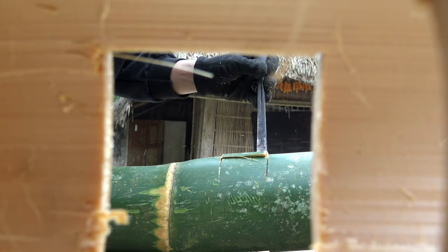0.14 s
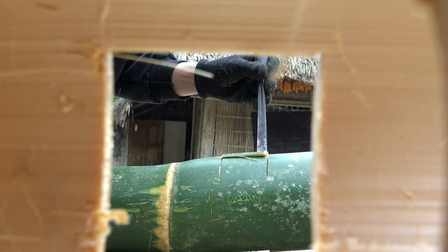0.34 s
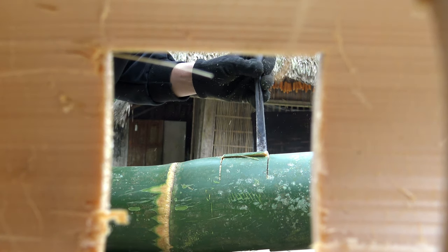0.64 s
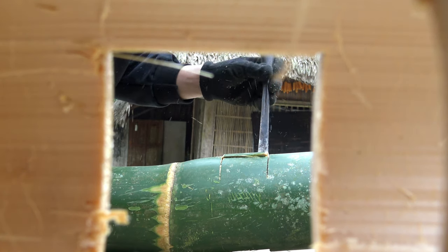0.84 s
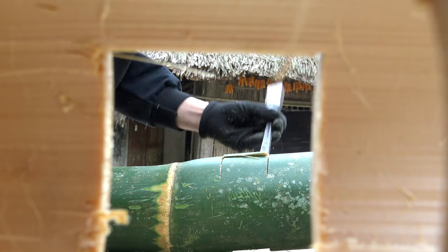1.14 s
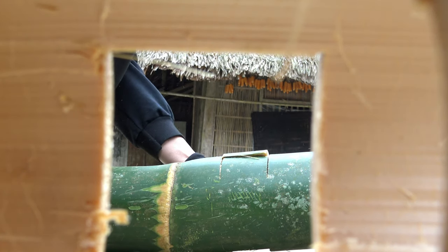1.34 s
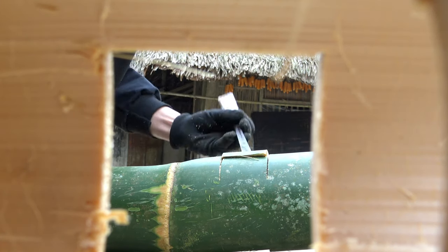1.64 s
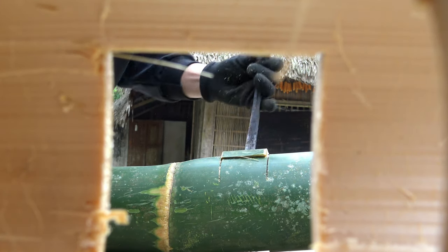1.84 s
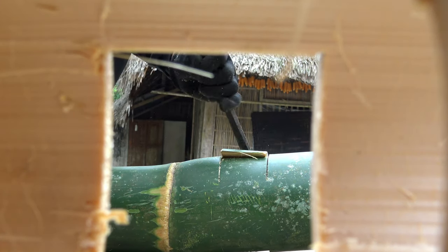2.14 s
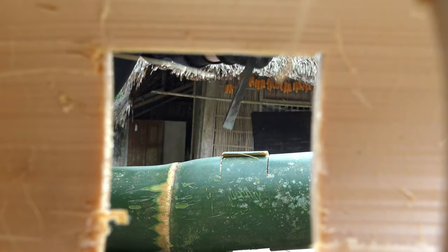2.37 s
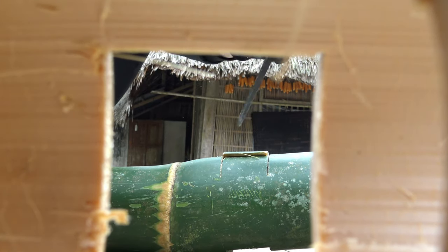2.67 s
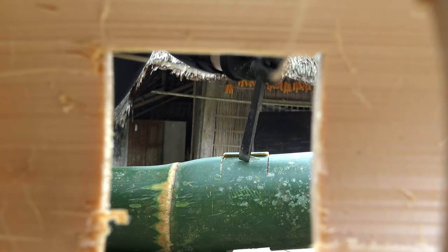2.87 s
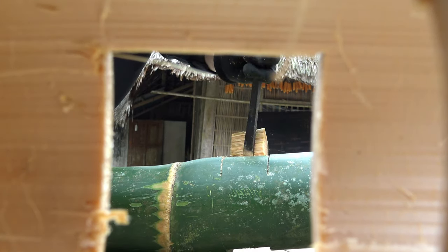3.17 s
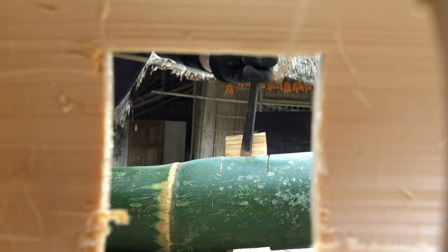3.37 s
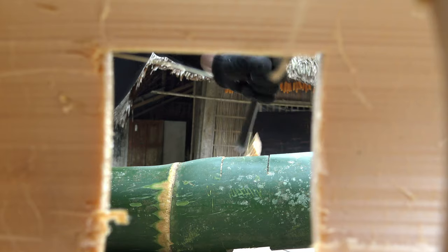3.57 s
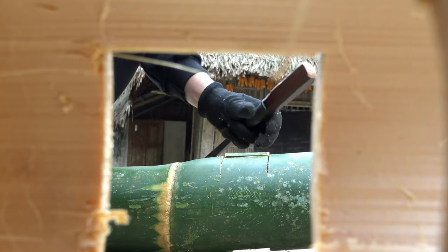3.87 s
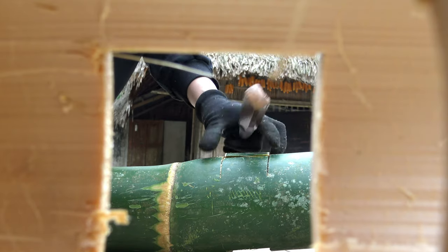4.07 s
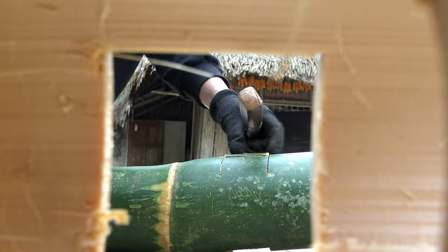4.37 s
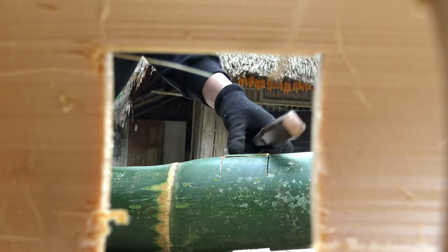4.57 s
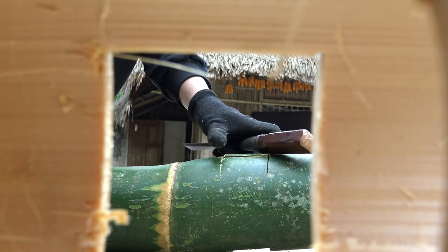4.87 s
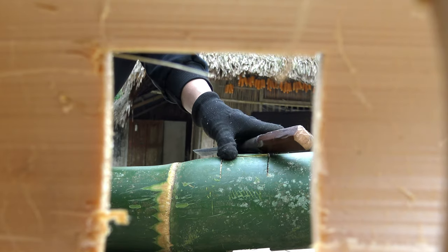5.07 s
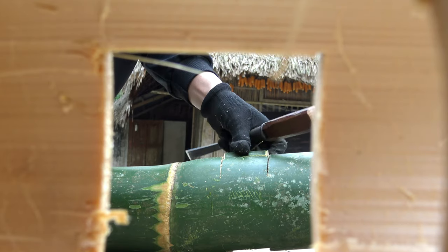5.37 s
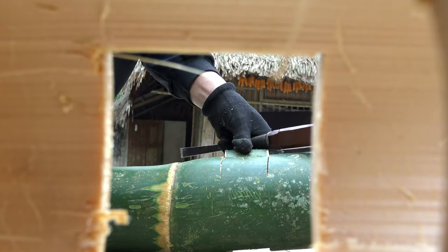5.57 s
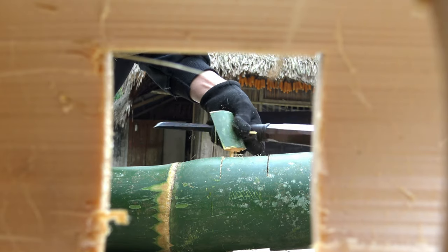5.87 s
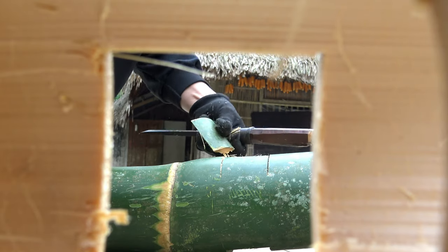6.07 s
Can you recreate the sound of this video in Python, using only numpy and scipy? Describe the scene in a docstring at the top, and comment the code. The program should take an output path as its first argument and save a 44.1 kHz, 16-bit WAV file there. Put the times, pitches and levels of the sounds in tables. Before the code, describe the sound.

Outdoors by a hut, with quiet air, a thin high insect hiss and a very faint bird, close to a thick bamboo tube. At about 0.1, 0.5 and 0.85 s three very loud blows drive a steel blade in: short hard ring, hollow boom, low thud, clipped by the microphone, with dying echoes from the yard. From 1.1 to 2.3 s the blade scrapes and levers in the cut, gritty and dry, with small woody knocks and a firmer one at 2.1. A short lull, then a dull knock at 2.9, a fast smooth slide at 3.05 ending in a knock at 3.2, more prying, a bright steel clink at 3.6 and a strong double knock near 3.74. Softer sparse taps and faint scraping run from 4.3 to 5.6. A loud woody crack at 5.74 frees the piece, followed by a light splintery clink at 5.9.

```python
"""Three hard blows drive a blade into a thick green bamboo tube: ringing steel modes, a boom from the tube, a thud.
The blade then scrapes and levers in the cut, as clumps of tiny slips that sound tube and steel.
Taps on modelled tube modes make the hollow knocks, until a piece of the wall snaps free.
A hut throws the blows back as dying noise; insects hiss as filtered noise and a small bird chirps far away.
The blows overload the close microphone, which clips and is then limited."""
import sys
import numpy as np
from scipy import signal
from scipy.fft import rfft, irfft, next_fast_len
from scipy.io import wavfile
from scipy.ndimage import uniform_filter1d

SR = 44100
rng = np.random.default_rng(int(sys.argv[2]) if len(sys.argv) > 2 else 0)


def dump_mix(stems):
    """Bounce the given channels to the path in sys.argv[1] as a 16-bit WAV at rate SR."""
    frames = np.atleast_2d(stems).T  # one column per channel
    limited = np.clip(frames, -1, 1)  # hard clip at full scale
    pcm = np.round(limited * 32767).astype(np.int16)
    wavfile.write(sys.argv[1], SR, pcm)


N = 273861  # length in samples

# Still air, relative spectrum: [f/Hz, density/dB per Hz]
AIR_SPECTRUM = [(20, -35.5), (45, -25), (100, -15.5), (170, -15.5), (300, -12.5), (600, -12), (1000, -16),
                (2200, -18.5), (3800, -18), (5500, -21), (6700, -32.5), (10000, -34.5), (15500, -33.5)]
# Steady band of insects, relative spectrum: [f/Hz, density/dB per Hz]
INSECT_SPECTRUM = [(3000, -41), (4200, -13), (4650, -4), (4950, -4.5), (5300, -8.5), (5900, -27),
                   (7200, -38.5), (7900, -17), (9000, -33.5)]
# Falling chirps of a far bird: [t/s, start f/Hz, level/dB]
BIRD_CHIRPS = [(2.965, 4400, -57), (4.57, 4450, -60), (5.03, 3810, -58.5), (5.941, 3960, -58),
               (6.084, 3500, -58)]
# Soft hollow hoots: [t/s, level/dB]
SOFT_HOOTS = [(2.54, -51.5), (4.08, -54.5), (4.545, -51.5), (5.03, -56)]
# Echo of the hut, relative colour: [f/Hz, level/dB]
ECHO_COLOUR = [(30, -44.5), (100, -20.5), (190, 1.5), (300, -7.5), (420, 1), (700, 2.5), (1100, -12.5),
               (2300, -11.5), (3200, -22), (4500, -27), (6000, -39), (9000, -45), (14000, -54.5)]
# Echo of the hut, decay: [f/Hz, t60/s]
ECHO_T60 = [(100, 0.48), (500, 0.35), (1500, 0.73), (4000, 0.98), (12000, 0.25)]

# Levering strokes in the cut; the more the edge bears, the more steel and fizz:
# [start t/s, end t/s, level/dB, edge/dB]
LEVER_STROKES = [(1.101, 1.225, -49, -3.5), (1.33, 1.374, -49, -18), (1.423, 1.562, -42, -18),
                 (1.682, 1.791, -46.5, -29), (1.81, 2.187, -42.5, -14.5), (2.219, 2.315, -59, -3.5),
                 (3.174, 3.23, -42.5, -10), (3.239, 3.33, -59.5, 2.5), (3.399, 3.502, -48, -10),
                 (3.499, 3.635, -41, -7.5), (4.271, 4.45, -52.5, -7.5), (5.198, 5.405, -59.5, -3),
                 (5.634, 5.768, -50, -15), (5.754, 5.816, -43.5, -12), (5.834, 6.055, -54.5, -6.5)]
# Fizz of the slipping edge, relative spectrum: [f/Hz, density/dB per Hz]
FIZZ_SPECTRUM = [(100, -47), (1200, -10), (2200, 16.5), (4500, 11.5), (7000, -5), (12000, -12),
                 (16000, -30)]
# Single fibres snapping, relative spectrum: [f/Hz, density/dB per Hz]
SNAP_SPECTRUM = [(100, -50), (1200, -1), (3500, 8.5), (8000, -7), (12000, -4), (16000, -14)]
# High modes of the free blade, rung when its edge scrapes or springs loose: [f/Hz, level/dB, t60/s]
STEEL_MODES = [(1950, 0, .02), (3025, -3, .04), (3903, -2, .032), (4818, -1, .045), (6051, -2, .03),
               (6850, -5, .02), (8400, -12, .018), (9650, -10, .018), (11510, -13, .014),
               (14200, -17, .014)]
# The edge springs loose and clinks: [t/s, level/dB]
EDGE_CLINKS = [(1.204, -50), (3.6111, -22.5), (5.89, -35.5)]

# Air column and wall of the tube, levels before spot-to-spot spread: [f/Hz, level/dB, t60/s]
TUBE_MODES = [(180.2, -20, 0.24), (240.2, -14, 0.17), (419.6, -1.5, 0.085), (549.3, -0.5, 0.12),
              (626.6, -6, 0.092), (743.3, -5, 0.16), (796.7, 0.5, 0.12), (948.8, 6, 0.12),
              (1050, -8.5, 0.063), (1288, -1, 0.077), (1376, -6, 0.13), (1434, -2, 0.067), (1560, 1, 0.042),
              (1777.5, 5.5, 0.051), (2040, -2.5, 0.032), (2202, -5.5, 0.0486), (2500, -10, .05),
              (2996, -3, 0.015), (3745, -9, 0.034), (4453, -7, .04), (4940, -10.5, .045)]
# Dense lesser modes of the wall, decay: [f/Hz, t60/s]
WALL_T60 = [(150, 0.085), (700, 0.17), (1500, 0.023), (3000, 0.096), (6000, 0.016), (14000, 0.029)]
# Dense lesser modes of the wall, relative colour: [f/Hz, level/dB]
WALL_COLOUR = [(30, -33), (110, -13), (180, -6), (330, 0.5), (1000, 6.5), (16000, -19)]
# Dull low thumps, one like a wall's echo just after the first blow, the others under knocks:
# [t/s, f/Hz, level/dB, t60/s]
LOW_THUMPS = [(.189, 428, -7.5, 0.072), (2.931, 335, -20, 0.12), (4.67, 201.6, -35, 0.27),
              (5.739, 402, -25.5, 0.11)]
# Knocks of blade and loose piece on the tube; over the cavity they sound hollow, breaking fibres they bite:
# [t/s, level/dB before the clack, hollow/dB, bite/dB]
TUBE_KNOCKS = [(1.140, -25.5, -1.5, 0.5), (1.170, -30, -8, 0), (1.2018, -37, 1, 20),
               (1.3303, -23.5, -6, -5.5), (1.376, -38.5, -16, -4), (1.479, -36, -12, -2),
               (1.532, -36, 18, -8), (1.672, -37.5, -6.5, -2.5), (1.762, -34, -1.5, -7.5),
               (2.139, -19, -4.5, -16.5), (2.847, -47, -1, 6), (2.93, -21.5, 3, -18.5),
               (3.2162, -18, -3.5, -5), (3.383, -44, 1, 3.5), (3.424, -26, 10.5, -5.5),
               (3.475, -36.5, -8, -3), (3.595, -34, 20, 6), (3.6126, -21, 9.5, 4.5), (3.7361, -20, -4, -30),
               (3.742, -13.5, -13.5, -26.5), (3.8231, -25, -8.5, -29), (4.399, -36, 11, -4),
               (4.442, -29.5, -9, -20.5), (4.608, -38.5, 17, -5), (4.670, -29.5, 2, -12),
               (4.898, -29.5, 5.5, -9.5), (5.354, -31.5, 4, -13.5), (5.362, -24.5, -6.5, -23),
               (5.383, -41, 0, 10), (5.489, -45, 3, 14), (5.540, -24, -4.5, -22), (5.63, -28.5, 2.5, -12.5),
               (5.738, -11.5, -6, -17.5), (5.801, -42.5, -6, 4), (5.8882, -36.5, 15, 23)]
# Band filters that split a knock: hollow, body, middle, crack, splinter [second-order sections]
KNOCK_REGISTERS = [signal.butter(4, edges, "band", fs=SR, output="sos") for edges in [(165, 680),
                   (680, 1150), (1150, 2800), (2800, 6500), (6500, 13300)]]

# Blows that drive the blade in:
# [t/s, blade ring/dB, upper modes/dB re ring, tube boom/dB, clap into the yard/dB, air column/dB]
DRIVING_BLOWS = [(0.1275, 7, 3, -6, 20, -33), (0.5024, 12.5, -18.5, -6, 18, -13.5),
                 (0.855, 9, -31.5, -5, 17.5, -8.5)]
# Bending modes of the wedged blade: [f/Hz, relative level/dB, t60/s]
BLADE_MODES = [(1875, 0, .045), (1765, -8, .035), (2230, -17, .04), (2530, -14, .03), (3213, 0, .04),
               (3330, -10, .04), (4600, -12, .03)]
# What rings on after a blow: [f/Hz, level/dB, t60/s]
AFTERRING_MODES = [(233, -27, .27), (549, -7, .21), (911, -20, .62), (945, -19, .2), (1364, -24, .25),
                   (1863, -32, .5), (2228, -31, .35), (2315, -27, .3), (2528, -30, .27), (3213, -26, .45)]
# The blade rings faintly again after a blow: [t/s, level/dB]
BLADE_REBOUNDS = [(.630, -19), (0.979, -21.5)]

# the wall's body sounds with the cavity: dB per dB of hollow
BODY_PER_HOLLOW = 0.73
# splinters follow the bite: dB at no bite
SPLINTER_DB = -12.5
# hard, biting knocks are sharp, soft ones chatter: dB at full level, dB per dB of level, dB per dB of bite
SHARP_DB, SHARP_PER_LEVEL, SHARP_PER_BITE = 10, 0.27, 0.25
# a biting edge brings out the wall's woody clack: dB at no bite, dB per dB of bite
CLACK_LOW_HZ, CLACK_HIGH_HZ = 2010, 3050
CLACK_DB, CLACK_PER_BITE = 5, 0.32
# levering: mean slip rate, then fizz at zero edge and dB per dB of edge
SLIPS_PER_S, FIZZ_DB, FIZZ_PER_EDGE = 1000, -4, 0.49
# the blade slides down through the cut in one fast, smooth pass
SLIDE_START_S, SLIDE_END_S, SLIDE_SLIPS_PER_S = 3.05, 3.226, 30000
SLIDE_DB, SLIDE_FIZZ_DB, SLIDE_STEEL_DB = -41.5, -3.5, -10
# a hard blow sets the air column swelling and humming on
COLUMN_HZ, COLUMN_T60_S, COLUMN_SWELL_S = 552, .2, 0.032


def amp(db):
    """Turns decibels into gain."""
    return np.exp(np.asarray(db) * (np.log(10) / 20))


def evened(x):
    """Scales a sound to an rms of one."""
    return x / np.sqrt(np.mean(x ** 2) + 1e-20)


def read(points, hz):
    """Reads a table on a log-frequency axis."""
    f, value = np.transpose(points)
    return np.interp(np.log(hz + 1), np.log(f + 1), value)


def add(mix, s, sound):
    """Lays a sound into the mix at time s."""
    part = mix[max(round(s * SR), 0):][:len(sound)]
    part += sound[:len(part)]


def seconds(length):
    """Makes a time axis in seconds."""
    return np.arange(int(length * SR)) / SR


def coloured(x, spectrum):
    """Filters a sound with a gain curve over frequency."""
    gain = amp(read(spectrum, np.fft.rfftfreq(len(x), 1 / SR)))
    return irfft(rfft(x) * gain, len(x))


def coloured_noise(spectrum):
    """A steady noise bed for the whole scene, at an rms of one."""
    return evened(coloured(rng.standard_normal(N), spectrum))


def ring(modes, t):
    """Struck modes: dying sines of alternating sign."""
    sound = 0
    for k, (hz, db, t60) in enumerate(modes):
        sound = sound + (-1) ** k * amp(db - 60 * t / t60) * np.sin(2 * np.pi * hz * t)
    return sound


def dying_noise(decay, size):
    """Noise in which each frequency dies at its own speed."""
    hz, t, bins = signal.stft(rng.standard_normal(size), SR, nperseg=256)
    bins = bins * amp(-60 * t / read(decay, hz)[:, None])
    return signal.istft(bins, SR, nperseg=256)[1][:size]


def chirp(start_hz, level_db, fall=0.14, length_s=0.057, blur=1.33):
    """A faint whistle that slides down by a fraction of its pitch, blurred by distance."""
    t = seconds(length_s)
    turns = np.cumsum(start_hz * (1 - fall * t / length_s)) / SR
    drift = uniform_filter1d(rng.standard_normal(SR), size=150)
    flutter = 1 + blur * evened(drift)[:len(t)]
    return amp(level_db) * evened(np.sin(2 * np.pi * turns) * flutter * np.hanning(len(t)))


def hoot(level_db, low_hz=625, high_hz=800, width_hz=35, length_s=0.083):
    """A soft swell of noise in two narrow resonances."""
    hz = np.fft.rfftfreq(SR, 1 / SR)
    peaks = sum(1 / (1 + ((hz - centre) / width_hz) ** 2) for centre in (low_hz, high_hz))
    swell = np.hanning(int(length_s * SR))
    noise = irfft(rfft(rng.standard_normal(SR)) * peaks)[:len(swell)]
    return amp(level_db) * evened(noise * swell)


def outdoors(insect_db=-57, air_db=-52, drone_db=-65):
    """Still air, the tube's lowest mode humming in it, a steady band of insects, and far calls."""
    air = amp(air_db) * coloured_noise(AIR_SPECTRUM)
    drone = amp(drone_db) * coloured_noise([(100, -76.5), (155, -9.0), (176, 0), (200, -3.5), (300, -66)])
    insects = amp(insect_db) * coloured_noise(INSECT_SPECTRUM)
    mix = air + drone + insects
    for s, start_hz, level_db in BIRD_CHIRPS:
        add(mix, s, chirp(start_hz, level_db))
    for s, level_db in SOFT_HOOTS:
        add(mix, s, hoot(level_db))
    return mix


def hut(x, arrival_s=0.07, spread_s=0.022, wall_db=6, onset_s=0.014):
    """Scattered echoes from the yard, with a cluster from the hut's wall."""
    t = seconds(.7)
    cluster = 1 + amp(wall_db) * np.exp(-.5 * ((t - arrival_s) / spread_s) ** 2)
    echo = coloured(dying_noise(ECHO_T60, len(t)), ECHO_COLOUR) * cluster
    echo *= np.minimum(t / onset_s, 1) ** 2
    echo *= np.minimum((t[-1] - t) / .2, 1) ** 2  # fade the tail out
    return signal.fftconvolve(x, echo / np.linalg.norm(echo))[:N]


def tube(spread_db=2, wall_db=7, click_db=11, click_s=0.00037):
    """The tube's answer to a tap: a dry click, then its modes; every spot favours other modes."""
    t = np.arange(8192) / SR
    modes = np.array(TUBE_MODES, float)
    modes[:, 1] += spread_db * rng.standard_normal(len(modes))
    click = amp(click_db) * rng.standard_normal(len(t)) * np.exp(-t / click_s)
    wall = coloured(amp(wall_db) * dying_noise(WALL_T60, len(t)) + click, WALL_COLOUR)
    fade = np.minimum((t[-1] - t) / .06, 1) ** 2
    return (ring(modes, t) + wall) * fade


def stroke(start, end, level_db, fizz_db, steel_db, slips_per_s,
           grain_db=3, clump_db=2.5, fade=0.18, snaps_per_s=110, snap_db=-3):
    """Clumps of tiny edge slips fizz and sound the tube and the steel; now and then a fibre tears."""
    size = int(np.clip((end - start) * SR, 64, SR / 2))
    pressure = np.pad(signal.windows.tukey(size, fade), (0, next_fast_len(size + SR // 10) - size))
    count = len(pressure)
    sign = rng.standard_normal(SR)[:count]
    chance = rng.random(SR)[:count]
    strength = rng.exponential(1, SR)[:count]
    drift = rng.standard_normal(SR)[:count]

    density = np.clip(slips_per_s / SR, 0, 1)
    clumps = evened(uniform_filter1d(drift, size=500))
    # a fast slide is smooth
    unevenness_db = (1 - density) ** 2 * (grain_db * np.minimum(strength, 4) + clump_db * clumps)
    slips = sign * (chance < density) * amp(unevenness_db) * pressure
    snaps = strength * (chance < snaps_per_s * (1 - density) / SR) * pressure

    # each slip and snap tears for about a millisecond
    tears = signal.lfilter([1], [1, -np.exp(-1 / (.001 * SR))], [abs(slips), snaps])
    slip_noise, snap_noise = tears * rng.standard_normal(SR)[:count]
    fizz = evened(coloured(slip_noise, FIZZ_SPECTRUM))
    fizz += amp(snap_db) * (1 - density) * evened(coloured(snap_noise, SNAP_SPECTRUM))

    hollow = evened(signal.fftconvolve(slips, tube())[:count])
    # the soft green wall swallows treble
    hollow = signal.sosfilt(signal.butter(2, 4500, fs=SR, output="sos"), hollow)
    steel = evened(signal.fftconvolve(slips, ring(STEEL_MODES, seconds(0.066)))[:count])
    sound = hollow + amp(steel_db) * steel + amp(fizz_db) * fizz
    return amp(level_db) * np.sqrt(count / size) * sound  # make up for the silent padding


def clink(level_db):
    """The free edge springs loose and rings its high modes."""
    return amp(level_db) * ring(STEEL_MODES, seconds(.1))


def thump(hz, level_db, t60, swell_s=0.0016):
    """A dull low thump: one dying sine that sets in softly."""
    t = seconds(.2)
    return ring([(hz, level_db, t60)], t) * (1 - np.exp(-t / swell_s)) ** 2


def contact(chatter=0.25, chatter_s=0.0033):
    """A first touch, then a few milliseconds of chatter as fibres give way."""
    t = seconds(.03)
    touches = rng.standard_normal(len(t)) * (rng.random(len(t)) < .25)
    force = chatter * touches * np.exp(-t / chatter_s)
    force[0] = 1
    return force / np.linalg.norm(force)


def knock(level_db, hollow_db, body_db, crack_db, splinter_db, sharp_db=0, chatter=0.14, click_db=12):
    """A sharp knock is mostly click, a blunt one chatters; the spot shares its energy among five registers."""
    answer = tube(click_db=click_db + max(sharp_db, 0))
    sound = signal.fftconvolve(contact(chatter / amp(sharp_db)), answer)
    shares = amp([hollow_db, body_db, 0, crack_db, splinter_db])
    bands = [signal.sosfilt(register, sound) for register in KNOCK_REGISTERS]
    sound = sum(share * evened(band) for share, band in zip(shares, bands))
    # the level is the whole energy spread over 40 ms
    return amp(level_db) * sound / np.linalg.norm(sound) * np.sqrt(.04 * SR)


def strike(level_db, hollow_db, bite_db, most_clack_db=3):
    """A knock whose body, clack, splinters and sharpness follow from its strength, hollowness and bite."""
    sharp_db = SHARP_DB + SHARP_PER_LEVEL * level_db + SHARP_PER_BITE * bite_db
    body_db = BODY_PER_HOLLOW * hollow_db
    sound = knock(level_db, hollow_db, body_db, bite_db, SPLINTER_DB + bite_db, sharp_db)
    band = signal.butter(1, [CLACK_LOW_HZ, CLACK_HIGH_HZ], "band", fs=SR, output="sos")
    clack = signal.sosfilt(band, sound)
    clack_db = min(CLACK_DB + CLACK_PER_BITE * bite_db, most_clack_db)
    return sound + (amp(clack_db) - 1) * clack  # boosts or cuts the clack band


def air_column(level_db):
    """The air in the tube takes a moment to start humming, then dies away."""
    t = seconds(.4)
    swell = t / COLUMN_SWELL_S
    return amp(level_db - 60 * t / COLUMN_T60_S) * swell * np.cos(2 * np.pi * COLUMN_HZ * t)


def rebound(level_db):
    """The wedged blade rings faintly again in its first three modes."""
    return amp(level_db) * ring(BLADE_MODES[:3], seconds(.1))


def blow(blade_db, upper_db, boom_db, upper_hz=2850, tick_db=-12, tick_s=0.0024,
         swell_s=0.002, thud_db=-27, thud_hz=75, thud_s=0.0068):
    """The blade rings hard and briefly; the tube takes up the blow and booms over a thud of the ground."""
    t = seconds(.8)

    def off_centre(modes):
        """An off-centre blow shifts the level of the upper modes."""
        return [(hz, db + upper_db * (hz > upper_hz), t60) for hz, db, t60 in modes]

    blade = ring(off_centre(BLADE_MODES), t)
    tick = amp(tick_db) * rng.standard_normal(len(t)) * np.exp(-t / tick_s)
    thud = amp(thud_db) * np.sin(2 * np.pi * thud_hz * t) * np.exp(-t / thud_s)
    body = ring(off_centre(AFTERRING_MODES), t) + thud
    add(body, 0, knock(boom_db, hollow_db=-3.0, body_db=-3.5, crack_db=-8.5, splinter_db=-28))
    return amp(blade_db) * (blade + tick) + body * (1 - np.exp(-t / swell_s))


def scene(work_echo_db=-38):
    """The clap of each blow carries across the yard; the work in the cut stays close and nearly dry."""
    blows, claps, work = np.zeros((3, N))
    for start, end, level_db, edge_db in LEVER_STROKES:
        fizz_db = FIZZ_DB + FIZZ_PER_EDGE * edge_db
        add(work, start, stroke(start, end, level_db, fizz_db, edge_db, SLIPS_PER_S))
    slide = stroke(SLIDE_START_S, SLIDE_END_S, SLIDE_DB, SLIDE_FIZZ_DB, SLIDE_STEEL_DB, SLIDE_SLIPS_PER_S)
    add(work, SLIDE_START_S, slide)
    for s, level_db in EDGE_CLINKS:
        add(work, s, clink(level_db))
    for s, hz, level_db, t60 in LOW_THUMPS:
        add(work, s, thump(hz, level_db, t60))
    for s, level_db, hollow_db, bite_db in TUBE_KNOCKS:
        add(work, s, strike(level_db, hollow_db, bite_db))
    for s, level_db in BLADE_REBOUNDS:
        add(blows, s, rebound(level_db))
    for s, blade_db, upper_db, boom_db, clap_db, column_db in DRIVING_BLOWS:
        add(blows, s, blow(blade_db, upper_db, boom_db))
        add(blows, s, air_column(column_db))
        add(claps, s, amp(clap_db) * contact())
    echoes = hut(claps + amp(work_echo_db) * work)
    return (blows + work + echoes + outdoors())[None]


def record(dry, threshold_db=-7, most_db=5, attack_s=.002, recovery_db_per_s=60, low_cut_hz=55, treble_hz=14000):
    """The input clips, a limiter pulls the overload down and lets go, then the band limits."""
    clipped = np.clip(dry[0], -1, 1)
    keep = np.exp(-1 / (attack_s * SR))
    power = signal.lfilter([1 - keep], [1, -keep], clipped ** 2)
    power_db = 10 * np.log10(power + 1e-12)
    # the gain reduction holds its peaks, which sink at the recovery rate
    fall = np.arange(N) / SR * recovery_db_per_s
    over_db = np.maximum.accumulate(np.clip(power_db - threshold_db, 0, most_db) + fall) - fall
    limited = clipped * amp(-signal.lfilter([1 - keep], [1, -keep], over_db))
    band = signal.butter(2, [low_cut_hz, treble_hz], "band", fs=SR, output="sos")
    limited = signal.sosfilt(band, limited)
    steep_cut = signal.firwin(255, 15900, window=("kaiser", 8), fs=SR)
    return signal.oaconvolve(limited, steep_cut, "same")[None]


dry = scene()
out = record(dry)
dump_mix(out)
```